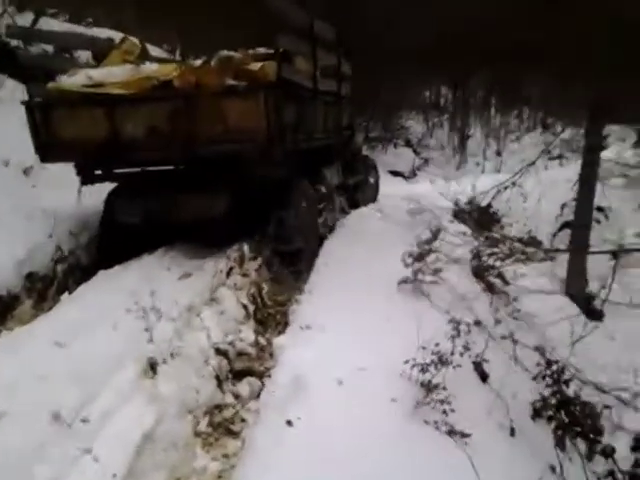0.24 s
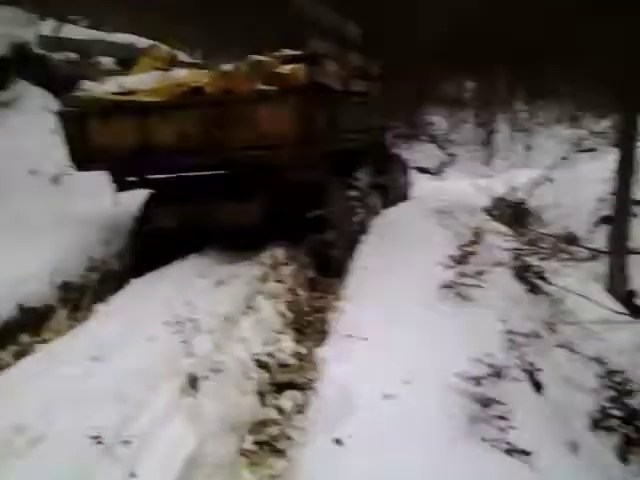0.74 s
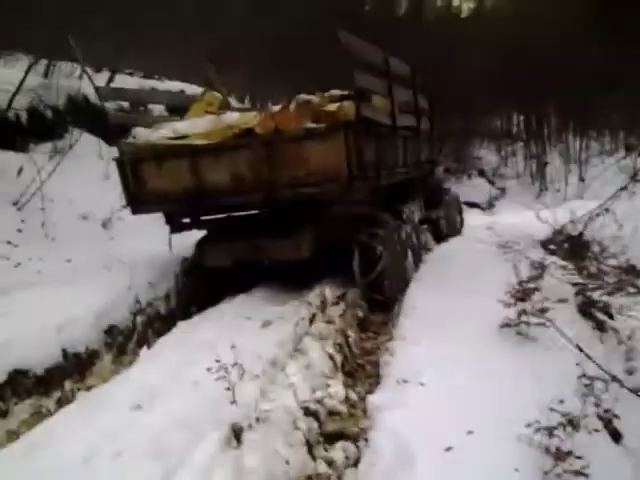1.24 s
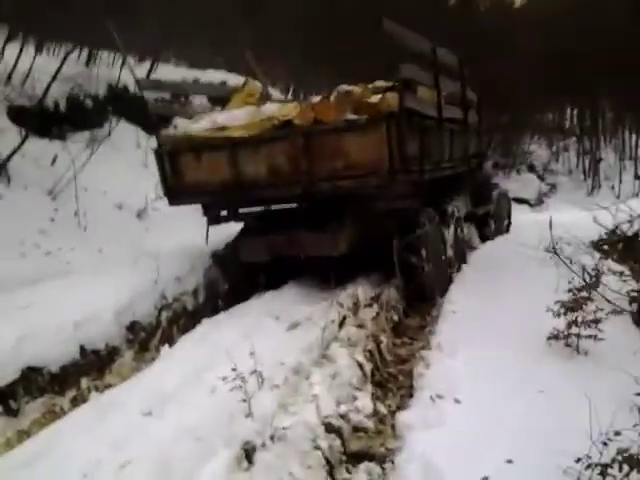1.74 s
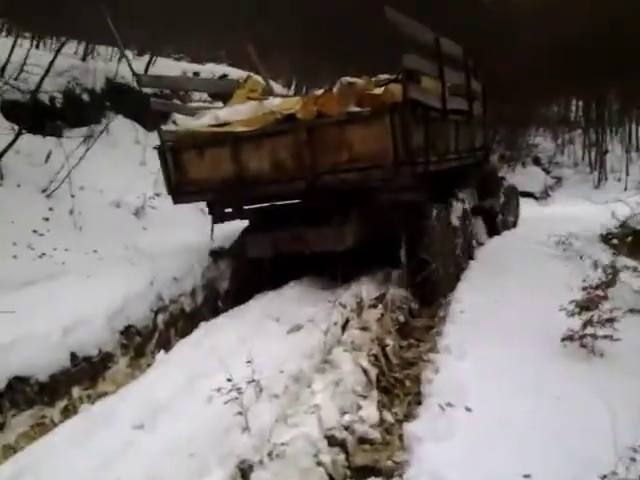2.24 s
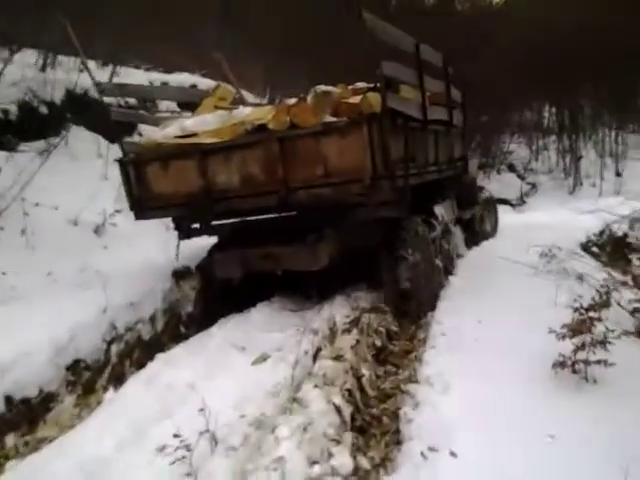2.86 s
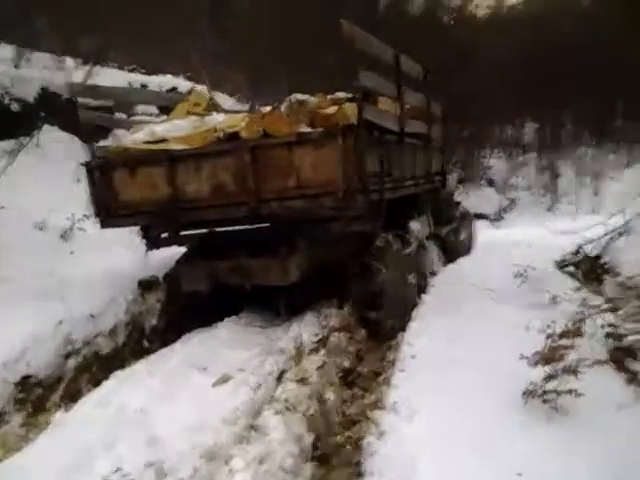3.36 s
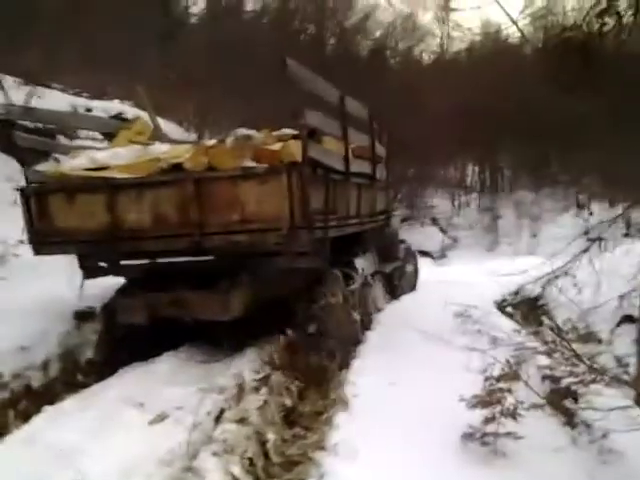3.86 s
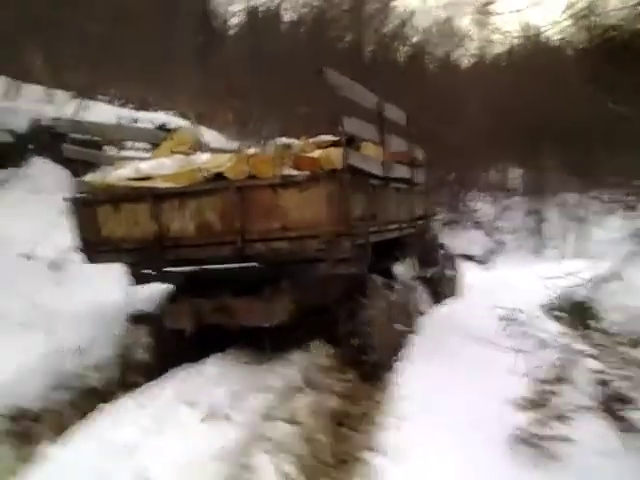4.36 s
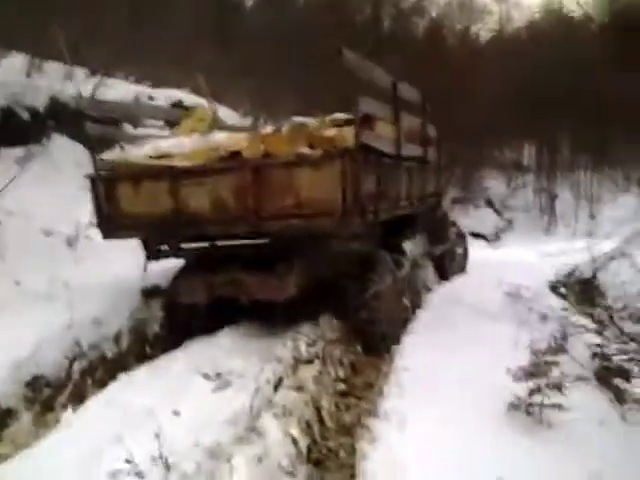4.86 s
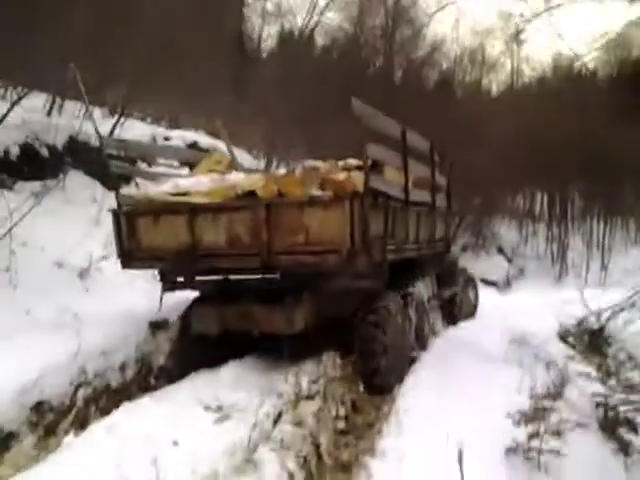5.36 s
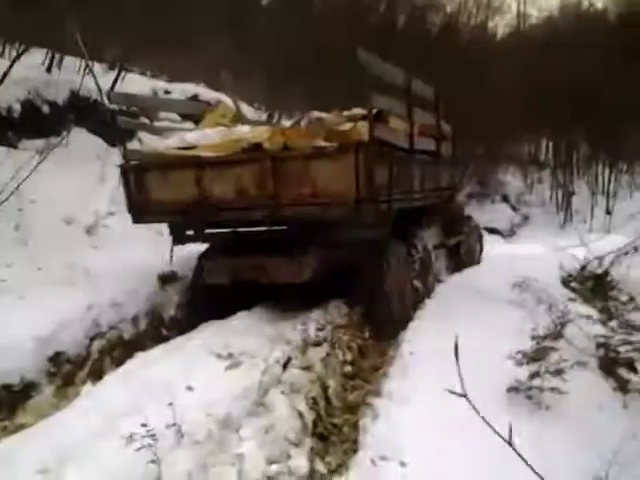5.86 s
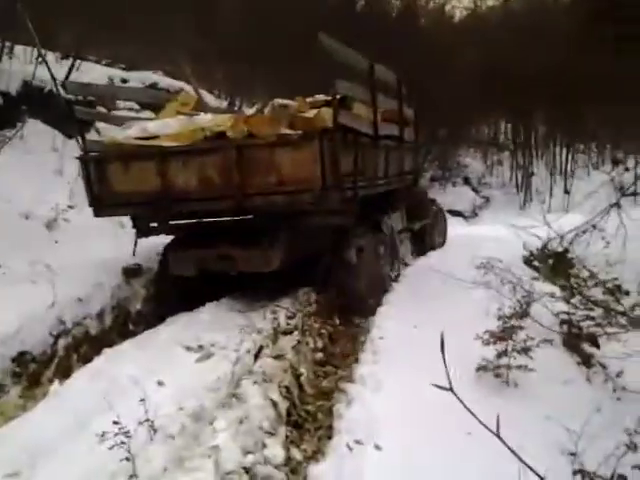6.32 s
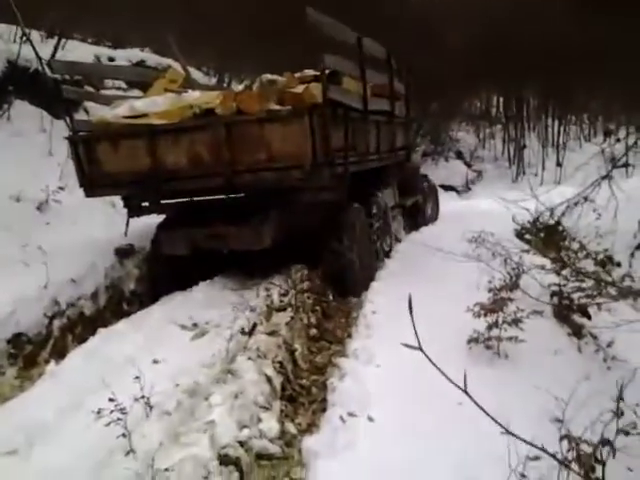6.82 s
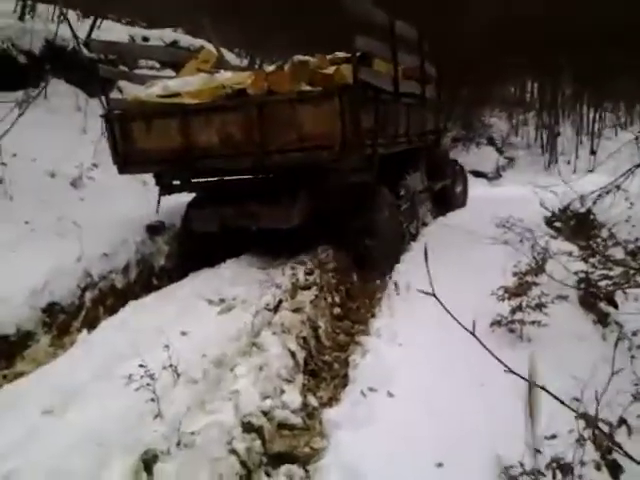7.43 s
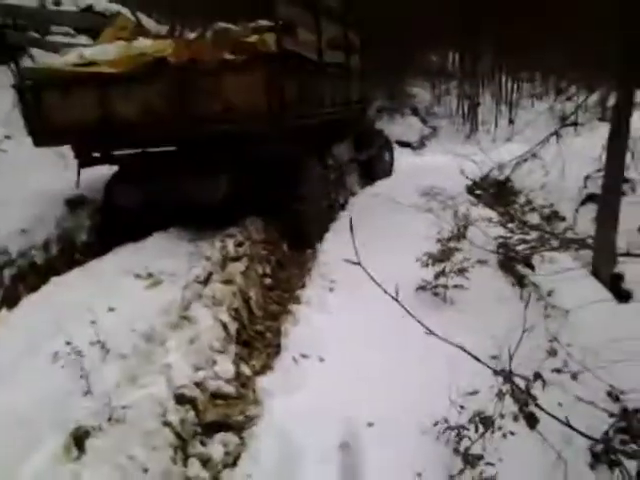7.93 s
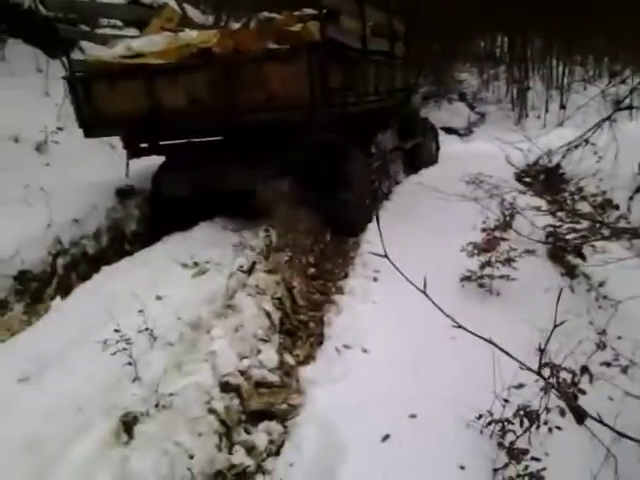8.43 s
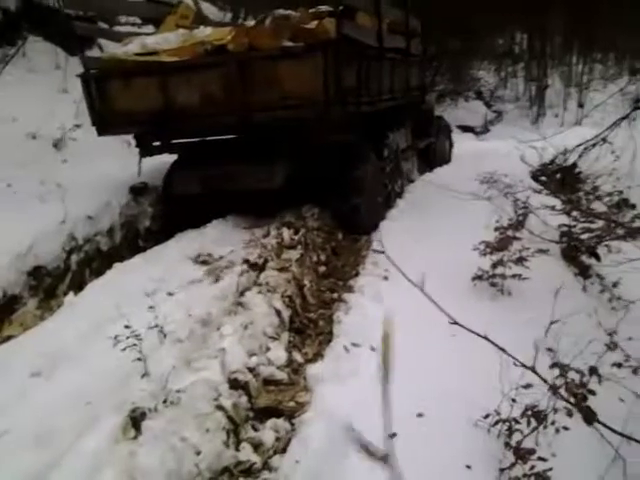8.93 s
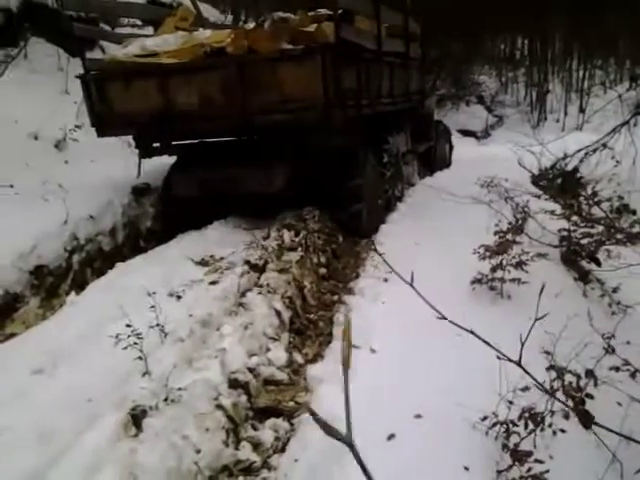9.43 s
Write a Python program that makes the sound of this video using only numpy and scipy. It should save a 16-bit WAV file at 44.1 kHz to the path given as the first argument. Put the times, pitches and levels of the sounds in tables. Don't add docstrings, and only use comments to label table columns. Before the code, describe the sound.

A rough diesel-like truck booms and rattles up a snowy track, chains jingling, dropping off throttle twice between a low pull and a louder one.

```python
import sys
import numpy as np
from scipy import signal
from scipy.fft import rfft, irfft, next_fast_len
from scipy.io import wavfile
from scipy.ndimage import uniform_filter1d, map_coordinates

SR = 44100
rng = np.random.default_rng(int(sys.argv[2]) if len(sys.argv) > 2 else 0)


def int16_out(signal):
    q = np.round(np.clip(np.atleast_2d(signal).T, -1, 1) * 32767)
    wavfile.write(sys.argv[1], SR, q.astype(np.int16))


def decibels_to_gain(level_db):
    exponent = np.asarray(level_db, float) / 20
    return 10 ** exponent


N = 426888

# time in seconds, firing rate in Hz, boom in dB, clatter in dB.
PULLS = [
    [(0.0, 62.5, -16.5, -34), (0.2, 59.36, -17.5, -34), (0.57, 64.7, -14, -31), (0.92, 61.23, -16.5, -33),
     (1.4, 62.98, -15, -34), (2.33, 61.04, -15.5, -33.5), (2.62, 63.58, -14, -32.5),
     (3.93, 63.83, -13, -35)],
    [(4.78, 45.67, -43, -63.5), (4.86, 50.13, -31, -49), (4.89, 51.9, -25.5, -36), (5.02, 59.3, -19, -32),
     (5.36, 60.27, -14, -31), (5.52, 64.07, -11.5, -26), (5.98, 73.9, -8, -26), (7.16, 72.43, -8.5, -32),
     (7.8, 68.4, -9, -31), (8.0, 64.7, -12.5, -33.5), (8.36, 63.9, -11, -31.5)],
]
# resting rate in Hz, settling time in seconds,
# boom fall in dB/s, clatter fall in dB/s.
COASTS = [
    (44.25, .2, 277, 129),
    (49, 0.14, 328, 238.5),
]
COAST_BOOM_DB, COAST_CLATTER_DB = -53.5, -62.5
# time in seconds, speed change in Hz,
# boom change in dB, clatter change in dB, half length in seconds.
SURGES = [(0.146, -0.24, -2, -5, .03), (0.415, 0.29, 1, 3.5, .1), (0.735, -0.5, 0.5, -5.5, 0.072),
          (1.102, 0.6, 1, 2.5, 0.11), (1.69, -.5, 0.1, -1, 0.096), (2.795, -0.03, 0.5, -0.5, 0.083),
          (2.95, 0.4, .7, -1.5, 0.075), (3.141, -0.5, -0.5, -1.5, 0.087), (3.343, .5, 1, 1, 0.068),
          (3.517, -0.11, 0, -3.5, .1), (3.663, -1.5, -1, 3.5, .08), (3.852, .5, 1, 9, 0.07),
          (5.104, 2.5, 3.5, 0, .07), (5.238, 0.5, -3.5, -9.5, 0.064), (5.81, 0.68, 0.8, 2, .17),
          (5.984, 0.2, 0, .5, 0.13), (6.288, -0.15, -2, -5.5, .06), (6.42, 0, .8, 0, .06),
          (6.58, 0, -0.8, -1, .06), (6.779, -0.06, -1.5, -3.5, .25), (7.041, 0, 0.46, 4, 0.16),
          (7.211, -2.5, -3, -4.5, .05), (7.324, -0.6, -0.5, 1, 0.055), (7.57, -0.28, -2, -2.5, .12),
          (7.834, 0.73, -1.5, 3, 0.071), (8.212, -1.75, -2.7, 4.5, 0.063), (8.342, 1.24, -2.5, -2.5, 0.05)]
# time in seconds, boom in dB, clatter in dB, half length in seconds.
STRAY_FIRINGS = [(4.061, -37, -51, .05), (4.509, -40, -71, .1), (4.711, -27, -70, 0.011),
                 (8.538, -26, -48.5, .1), (8.625, -26, -43.5, 0.046), (8.714, -29, -54, 0.036),
                 (9.071, -20.5, -62, .025), (9.149, -26.5, -44.5, 0.053), (9.209, -22.5, -46, 0.022),
                 (9.522, -32, -45.5, 0.099), (9.68, -37.5, -51, 0.031)]
STRAY_HZ, STRAY_LAG_S = 100.1, 0.09

# boom in dB, second harmonic in dB, its flutter in dB, rumble in dB.
WITH_BOOM = [(-36.5, -33, 1.5, -47), (-30, -29.5, -2, -44), (-22.5, -29.5, 3.5, -41),
             (-18.5, -34, 2.5, -40.5), (-15.5, -37.5, 0.5, -40), (-13, -30, 0.5, -37),
             (-6.5, -23.5, -1.5, -33.5)]
# clatter in dB, hiss in dB.
WITH_CLATTER = [(-58, -50), (-44.5, -40.5), (-35, -33.5), (-25, -27.5)]
# firing rate in Hz, boost in dB.
WITH_SPEED = [(49, 1.5), (55, -1.5), (60, -0.5), (64.5, 0), (69, 5), (74, 4)]

# multiple of the firing rate, level in dB re load,
# share of the boom's swell, flutter in dB.
OVERTONES = [(3, -29.5, 0.65, 3), (4, -34, 0.6, 4.5), (5, -33, -0.79, 4), (7, -47.5, .8, 3),
             (8, -32.5, -0.0033, 2), (10, -43.5, 0.24, 4.5)]
# multiple of crank speed, level in dB re load.
CRANK_ORDERS = [(2, -41.5), (4, -36.5), (5, -40), (7, -41.5), (8, -47)]
# centre in Hz, half width in Hz, boost in dB.
PIPE_RESONANCES = [(274.3, 11, 5), (548, 13, 7)]

# frequency in Hz, level in dB.
RUMBLE_COLOUR = [(25, -14.5), (45, -15.5), (60, 2), (100, -1.5), (160, -8.5), (250, -11), (400, -17.5),
                 (700, -15.5), (1100, -19), (1600, -19.5)]
# frequency in Hz, level in dB per Hz.
BLOCK_COLOUR = [(76, -14.5), (130, 8.5), (246, -12.5), (400, -22.5), (707, -16), (1080, -20.5),
                (1480, -15.5), (2150, -19.5), (3400, -26.5), (5210, -23.5), (7160, -35), (9310, -68),
                (15800, -120)]
BLOCK_DB = -39
# frequency in Hz, level in dB per Hz.
HISS_COLOUR = [(410, -22.5), (700, -7), (757, -20), (1040, -9.5), (1400, -7), (1820, -2), (2120, -3),
               (3840, -4.5), (5560, -5), (7160, -30), (9310, -60), (15800, -120)]

KNOCK_DB = [0, -4]
RATTLE = .55
SNAP_LAG, SNAP_WIDTH, SNAP_RATTLE = .2, .085, .3
# pitch in Hz, width in Hz, level in dB lugging, level in dB revving.
PANELS = [(545, 30, -34, -22), (705, 40, -27, -31), (1270, 55, -20, -24), (1030, 50, -19, -25),
          (1450, 32, -40, -18), (2010, 50, -22, -17), (2280, 70, -20, -19), (2500, 110, -15.5, -26),
          (2880, 50, -19, -19), (3090, 50, -22, -16), (3480, 45, -26, -20), (3710, 110, -20, -13),
          (3960, 120, -14, -15), (4410, 80, -22, -20), (4880, 80, -19, -18)]
REV_FROM_S, REV_OVER_S = 4.4, .5
# pitch in Hz, width in Hz, level in dB.
BONNET = [
    (1845, 130, -11),
    (1795, 48, -12.5),
]
# time in seconds, level in dB.
BONNET_SLACK = [(0, -12), (.3, -4), (.6, -1), (1.2, -2.5), (1.5, -10), (1.9, -1.5), (2.7, -0.5), (3.3, 1),
                (3.9, -3), (5, 3), (5.8, 2), (6.2, 4.5), (6.75, 0.5), (7.0, 2.5), (7.5, 6), (8, -6),
                (9.7, 1)]
# time in seconds, peak in dB, pitch in Hz.
RAPS = [(0.2817, -17.5, 2450), (0.3803, -18.5, 4200), (0.4767, -17.5, 4080), (1.1264, -21, 5080),
        (1.3396, -17.5, 3930), (1.4343, -18, 2930), (2.4526, -21, 2740), (2.591, -21.5, 3840),
        (2.9661, -25, 2650), (3.0622, -24.5, 3930), (3.5828, -20.5, 5510), (3.6312, -20, 2770),
        (4.8845, -21.5, 2820), (4.997, -17, 2820), (5.0492, -16.5, 2850), (5.411, -15, 3090),
        (5.4743, -17.5, 3690), (5.5373, -15.5, 4310), (5.5808, -17, 4330), (5.805, -13, 3660),
        (5.8481, -13, 3100), (5.9155, -8.5, 3790), (6.4172, -16, 3950), (6.746, -21, 3650),
        (6.9127, -18.5, 2880), (6.995, -17.5, 3700), (7.0783, -18.5, 3120), (7.2619, -19.5, 3110),
        (7.3317, -15.5, 3130), (8.0261, -19.5, 2440), (8.2093, -18, 3940)]

LINKS_PER_S, LINKS_DB = 63, -9
# start in seconds, peak in dB, pitch in Hz, t60 in seconds.
CLINKS = [(0.184, -17.5, 2190, 0.046), (0.8499, -21.5, 2475, 0.045), (1.049, -24, 3197, 0.077),
          (0.952, -20, 2400, .06), (2.005, -22, 2540, .05), (2.1049, -17, 2410, 0.072),
          (2.2977, -21, 2450, .06), (2.3967, -23.5, 3900, 0.066), (2.7776, -17, 1860, 0.051),
          (3.247, -22.5, 1850, .06), (1.529, -14, 3980, 0.032), (1.6208, -21, 2319, 0.096),
          (3.161, -25.5, 5350, 0.1), (3.8219, -22.5, 4080, 0.079), (5.677, -13, 3390, 0.033),
          (5.716, -9.5, 3853, .03), (6.0118, -8.5, 3740, 0.034), (6.149, -10, 4550, 0.018),
          (6.21, -19.5, 1796, 0.059), (7.7562, -16, 1878, .08), (6.3365, -24, 1960, 0.12),
          (6.542, -18, 1910, 0.034), (7.4476, -20, 1920, 0.043), (8.1207, -24, 2480, 0.0446)]
# start in seconds, peak in dB, pitch in Hz, t60 in seconds.
TICKS = [(1.7, -20, 6500, 0.016), (1.9, -9.5, 5500, 0.0088), (4.0244, -15, 4100, 0.019),
         (4.4, -28, 5350, 0.025), (4.4223, -26, 5070, 0.025), (4.8032, -34, 2010, 0.056),
         (4.1, -30, 1300, 0.039), (4.424, -32, 2500, 0.022), (9.096, -26, 2500, .02),
         (4.026, -20.5, 2600, 0.017), (8.357, -23.5, 5576, 0.025), (8.626, -15, 6060, 0.013),
         (8.678, -29, 6000, 0.019), (8.6858, -25.5, 4000, 0.03), (8.741, -29, 5000, 0.021)]
# start in seconds, peak in dB, start pitch in Hz, end pitch in Hz,
# length in seconds.
SQUEAKS = [(9.074, -37.5, 1900, 2700, 0.025), (9.09, -33.5, 2750, 2400, 0.031),
           (9.098, -40.5, 2680, 2600, .04), (9.128, -37.5, 1900, 1500, .03), (9.172, -40, 2600, 2900, .03),
           (8.2, -40, 1200, 1300, 0.033), (9.126, -34, 2300, 1850, 0.045),
           (9.185, -37.5, 1300, 1800, 0.035), (9.15, -39, 4000, 4070, 0.09)]
# centre in seconds, peak in dB, pitch in Hz, length in cycles.
POPS = [(3.13, -23, 301.8, 0.78), (3.9505, -13.5, 258, 0.94), (3.995, -22, 300, .6),
        (4.0274, -12.5, 260, 0.42), (4.0672, -22, 298, 0.47), (4.067, -24.5, 1150, 1.5),
        (8.67, -28, 720, 1.8), (8.669, -37, 1200, 1.4), (4.957, -19, 800, 1.2), (4.965, -26, 900, 2.8),
        (6.19, -21, 279.7, 0.46), (6.435, -18, 369, 0.76), (6.7, -24, 370, 0.82), (7.17, -21, 360, 0.87),
        (7.424, -14, 342, 0.73), (7.424, -26, 790, 1.6), (7.554, -16, 553.6, 0.74), (7.582, -12, 520, 0.5),
        (8.671, -10.5, 268, 0.76), (8.925, -35, 488, 0.96), (9.058, -21.5, 110.8, 0.65)]
POP_AFTER_DB, POP_AFTER_S = -22, 0.012
POP_ONSET, POP_TAIL, POP_SAG, POP_GRIT = 3, 0.63, 0.14, 0.13
# start in seconds, rms level in
# dB, centre in Hz, width in Hz, # length in seconds.
SWELLS = [(4.539, -45, 820, 750, 0.16), (5.3, -39.5, 2120, 600, 0.075), (4.06, -56, 4800, 1800, 0.47),
          (8.46, -42, 2030, 1400, 0.2), (8.72, -54, 5600, 780, 0.27), (4.45, -50.5, 1570, 270, .36),
          (4.08, -53, 2330, 1300, 0.3), (4.8, -42, 2150, 700, .085), (5.2, -46.5, 970, 540, .07),
          (4.3, -49, 5200, 550, .03), (4.8, -42, 1850, 180, 0.028), (9.08, -48, 4900, 1000, 0.2),
          (9.42, -48.5, 2100, 1200, 0.28), (8.905, -39, 500, 450, 0.049), (9.08, -42.5, 2400, 1100, 0.2)]


def evened(x):
    return x / np.sqrt(np.mean(x ** 2) + 1e-20)


def coloured(x, points):
    size = next_fast_len(len(x))
    hz, db = np.transpose(points)
    log_hz = np.log(np.fft.rfftfreq(size, 1 / SR) + 1)
    shape = np.interp(log_hz, np.log(hz), db, left=-90, right=-90)
    return irfft(rfft(x, size) * decibels_to_gain(shape), size)[:len(x)]


def resonate(x, hz, width):
    r = np.exp(-np.pi * width / SR)
    return signal.lfilter([1, 0, -1], [1, -2 * r * np.cos(2 * np.pi * hz / SR), r * r], x)


def drift(hz):
    count = int(N / SR * 2 * hz) + 3
    places = np.linspace(0, count - 1, N // 64)
    coarse = map_coordinates(rng.standard_normal(count), [places], order=3)
    return np.interp(np.arange(N), np.linspace(0, N, N // 64), coarse)


def bump(t, s, half, sharp):
    return np.exp(-abs((t - s) / half) ** sharp)


def add(mix, s, sound):
    part = mix[round(s * SR):][:len(sound)]
    part += sound[:len(part)]


def coast(t, pull, rest_hz, settle_s, boom_fall, clatter_fall):
    s, *columns = np.transpose(pull)
    hz, boom_db, clatter_db = (np.interp(t, s, c) for c in columns)
    after = np.maximum(t - s[-1], 0)
    hz = rest_hz + (hz - rest_hz) * np.exp(-after / settle_s)
    return np.array([hz, boom_db - boom_fall * after, clatter_db - clatter_fall * after])


def controls():
    t = np.arange(0, N + 64, 64) / SR
    first, last = (coast(t, pull, *row) for pull, row in zip(PULLS, COASTS))
    second_pull_s = PULLS[1][0][0]
    hz, boom_db, clatter_db = np.where(t < second_pull_s, first, last)
    gain_hz, bite_db, rattle_db = sum(np.outer(change, bump(t, s, half, sharp=1.13))
                                      for s, *change, half in SURGES)
    stray, jolt = sum(np.outer(decibels_to_gain(np.array([boom, clatter])), bump(t, s, half, sharp=2.9))
                      for s, boom, clatter, half in STRAY_FIRINGS)
    keep = np.exp(-t[1] / STRAY_LAG_S)
    hz = hz + gain_hz + STRAY_HZ * signal.lfilter([1 - keep], [1, -keep], stray)
    boom_db = 20 * np.log10(decibels_to_gain(boom_db + bite_db) + decibels_to_gain(COAST_BOOM_DB) + stray)
    clatter_db = 20 * np.log10(decibels_to_gain(clatter_db + rattle_db) + decibels_to_gain(COAST_CLATTER_DB) + jolt)

    level, *follow = np.transpose(WITH_BOOM)
    second_db, flutter_db, rumble_db = (np.interp(boom_db, level, c) for c in follow)
    hiss_db = np.interp(clatter_db, *np.transpose(WITH_CLATTER))
    curves = (hz, boom_db, second_db, flutter_db, hiss_db, clatter_db, rumble_db)
    hz, boom_db, second_db, flutter_db, *rest = (np.interp(np.arange(N) / SR, t, c) for c in curves)
    second_db = second_db + np.interp(hz, *np.transpose(WITH_SPEED)) + flutter_db * drift(hz=6)
    fired = np.cumsum(hz) / SR
    return fired, boom_db, second_db, *rest


def exhaust(fired, boom_db, second_db):
    turn = 2 * np.pi * fired + 0.019 * drift(hz=11)
    boom = -decibels_to_gain(boom_db + 0.39 * drift(hz=13)) * np.cos(turn)
    coasting = np.clip((-22 - boom_db) / 10, 0, 1)
    ragged_db = (-0.74 + 3.3 * coasting) * drift(hz=25.18)
    second = -decibels_to_gain(second_db + ragged_db) * np.cos(2 * turn + 0.11 + 0.044 * drift(hz=1.9))

    load_db = np.minimum(boom_db, -14.)
    swell_db = boom_db - load_db
    blur = .13 + .055 * swell_db
    rate_hz = np.gradient(fired) * SR
    upper = 0
    for k, db, share, flutter_db in OVERTONES:
        pipe_db = sum(boost / (1 + ((k * rate_hz - hz) / half) ** 2) for hz, half, boost in PIPE_RESONANCES)
        wander_db = (flutter_db + 0.21 * swell_db) * np.minimum(drift(hz=4.5), 1)
        smear = (k / 5 + .3) ** 2 * blur * drift(hz=14)
        upper += decibels_to_gain(load_db + db + share * swell_db + pipe_db + wander_db) * np.cos(k * turn + smear)
    crank = sum(decibels_to_gain(load_db + db + 2. * drift(hz=5.3)) * np.cos(k * turn / 3 + drift(hz=1.1))
                for k, db in CRANK_ORDERS)
    return np.sqrt(2) * (boom + second + upper + crank)


def rumble(fired, rumble_db):
    puffs = 1.0 + np.exp(-(fired % 1) / 0.55) * decibels_to_gain(1.6 * drift(hz=30.6))
    gas = evened(coloured(puffs * rng.standard_normal(N), RUMBLE_COLOUR))
    block = evened(coloured(rng.standard_normal(N), BLOCK_COLOUR))
    return decibels_to_gain(rumble_db + 4.0 + 1.5 * drift(hz=6)) * gas + decibels_to_gain(BLOCK_DB + 0.14 * drift(hz=6.5)) * block


def panels(shaken, rev):
    rings = np.zeros(N)
    for hz, width, lug_db, rev_db in PANELS:
        level_db = lug_db + rev * (rev_db - lug_db) + 4.2 * np.minimum(drift(hz=7), 1.2)
        rings += decibels_to_gain(level_db) * evened(resonate(shaken[hz > 2800], hz, width))
    slack_db = np.interp(np.arange(N) / SR, *np.transpose(BONNET_SLACK)) + 1.8 * drift(hz=12)
    bonnet = sum(share * decibels_to_gain(db) * evened(resonate(shaken[0], hz, width))
                 for share, (hz, width, db) in zip((1 - rev, rev), BONNET))
    return rings + decibels_to_gain(slack_db) * bonnet


def clatter(fired, hiss_db, bright_db):
    rev = np.clip((np.arange(N) / SR - REV_FROM_S) / REV_OVER_S, 0, 1)
    crank = fired / 3 + 0.37
    turns = crank.astype(int)
    uneven_db = np.take(KNOCK_DB, turns % 2) * (1 - .6 * rev)
    strength = decibels_to_gain(uneven_db + 2. * rng.standard_normal(300)[turns])
    rattle = decibels_to_gain(2.8 * drift(hz=30.26))
    knock = uniform_filter1d(strength * np.exp(-(crank % 1) / .33), size=250)
    knock += RATTLE * uniform_filter1d(np.exp(-(fired % 1) / 0.72), size=60) * rattle
    snap = strength * bump(crank % 1, SNAP_LAG, SNAP_WIDTH, 2)
    snap += SNAP_RATTLE * (1.6 + .6 * bump(fired % 1, .5, .2, 2)) * rattle

    noise = rng.standard_normal(N)
    dull, bright = (.75 * evened(coloured((1 + .65 * push) * noise, HISS_COLOUR))
                    for push in (knock, 1.1 * snap))
    rings = panels([(1 + 3 * push) * noise for push in (knock, snap)], rev)
    below = signal.butter(3, 2800, "low", fs=SR, output="sos")
    above = signal.butter(3, 2800, "high", fs=SR, output="sos")
    low = evened(signal.sosfiltfilt(below, dull + rings))
    high = evened(signal.sosfiltfilt(above, bright + rings))
    out = decibels_to_gain(hiss_db - 2.0 + 1.0 * drift(hz=7)) * low + decibels_to_gain(bright_db - 4.0) * high
    for s, db, hz in RAPS:
        add(out, s, decibels_to_gain(db - 12) * clink(hz, .05, .55, width=210))
    return out


def clink(hz, t60, spread, rise_s=.003, width=130):
    t, burst = np.arange(4000) / SR, rng.standard_normal(4000)
    ring = evened(resonate(burst, hz, width)) + spread * burst
    return ring * decibels_to_gain(-60 * t / t60) * np.minimum(t / rise_s, 1)


def chain_jingle(bright_db):
    size = decibels_to_gain(3.2 * np.minimum(rng.exponential(1, N), 2)) * (rng.random(N) < LINKS_PER_S / SR)
    link = rng.integers(0, 8, N)
    jingle = np.zeros(N)
    for k, hz in enumerate(np.geomspace(2050, 5800, num=8)):
        jingle += signal.oaconvolve(size * (link == k), clink(hz, 0.13, 0.06, width=0.039 * hz))[:N]
    turning = bright_db > -41
    return decibels_to_gain(bright_db + LINKS_DB) * evened(jingle) * turning


def chain_strikes():
    out = np.zeros(N)
    for s, db, hz, t60 in CLINKS:
        add(out, s, decibels_to_gain(db - 8.0) * clink(hz, 1.5 * t60, 0.27, width=250))
    return out


def ice_ticks():
    out = np.zeros(N)
    for s, db, hz, t60 in TICKS:
        add(out, s, decibels_to_gain(db - 8.0) * clink(hz, t60, 0.81, 0.00056, width=520))
    return out


def pops():
    out, t = np.zeros(N), np.arange(-1000, 1000) / SR
    grit = evened(uniform_filter1d(rng.standard_normal((len(POPS), len(t))), size=36))
    for (s, db, hz, cycles), rough in zip(POPS, grit):
        turns = hz * t
        sag = 1 + POP_SAG * abs(turns) * (t > 0)
        swing = np.cos(2 * np.pi * turns / sag) + POP_GRIT * rough
        fade = np.exp(-np.where(t < 0, POP_ONSET, POP_TAIL) * (turns / cycles) ** 2)
        add(out, s + t[0], -decibels_to_gain(db) * swing * fade)
        add(out, s, decibels_to_gain(db + POP_AFTER_DB) * rough * np.exp(-(t - t[0]) / POP_AFTER_S))
    return out


def lull_swells():
    out = np.zeros(N)
    for s, db, hz, width, length in SWELLS:
        count = round(length * SR)
        murmur = evened(resonate(resonate(rng.standard_normal(SR // 2), hz, width), hz, width))
        add(out, s, decibels_to_gain(db) * murmur[:count] * signal.windows.tukey(count, .6))
    return out


def squeaks():
    out = np.zeros(N)
    for s, db, from_hz, to_hz, length in SQUEAKS:
        glide = np.linspace(from_hz, to_hz, round(length * SR))
        rough = 1 + 0.79 * evened(uniform_filter1d(rng.standard_normal(4000), size=60))[:len(glide)]
        tone = np.sin(2 * np.pi * np.cumsum(glide) / SR)
        add(out, s, decibels_to_gain(db) * rough * tone * np.hanning(len(glide)))
    return out


def scene():
    fired, boom_db, second_db, hiss_db, bright_db, rumble_db = controls()
    engine = exhaust(fired, boom_db, second_db) + rumble(fired, rumble_db)
    engine += clatter(fired, hiss_db, bright_db)
    chains = chain_jingle(bright_db) + chain_strikes() + ice_ticks() + squeaks()
    return (engine + chains + pops() + lull_swells())[None]


def roll_off(x):
    return signal.sosfilt(signal.butter(12, 15850, fs=SR, output="sos"), x)


def record(dry):
    low_cut = signal.sosfilt(signal.butter(1, 20, "high", fs=SR, output="sos"), dry)
    dull = signal.sosfilt(signal.butter(20, 6800, fs=SR, output="sos"), low_cut) + 0.0084
    over = .016 * np.logaddexp(0, (abs(dull) - .712) / .016)
    return roll_off(dull - np.sign(dull) * over)


dry = scene()
out = record(dry)
int16_out(out)
```